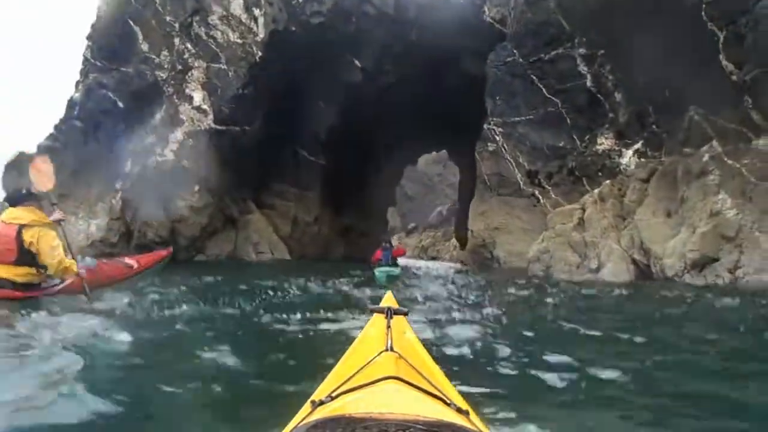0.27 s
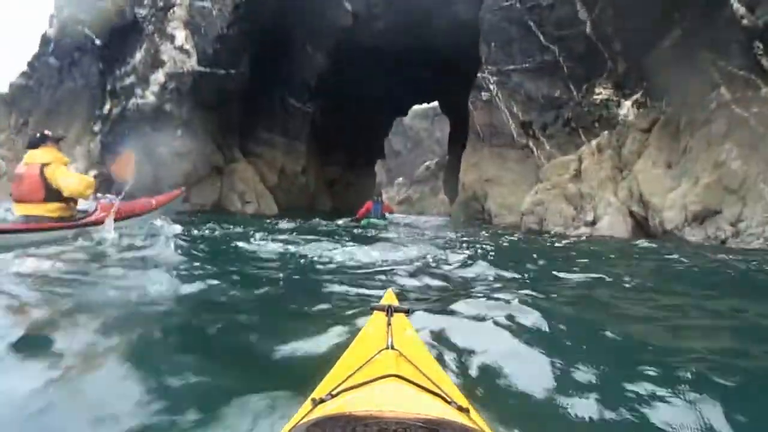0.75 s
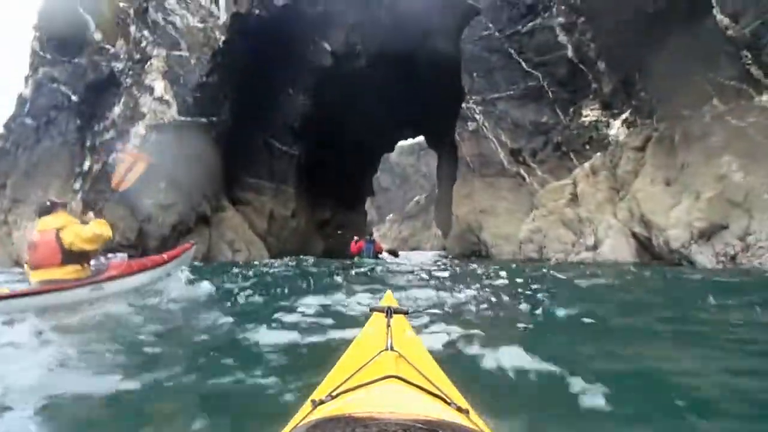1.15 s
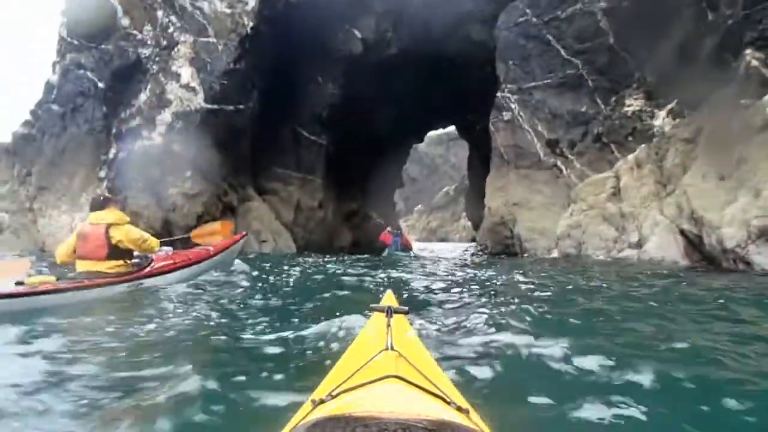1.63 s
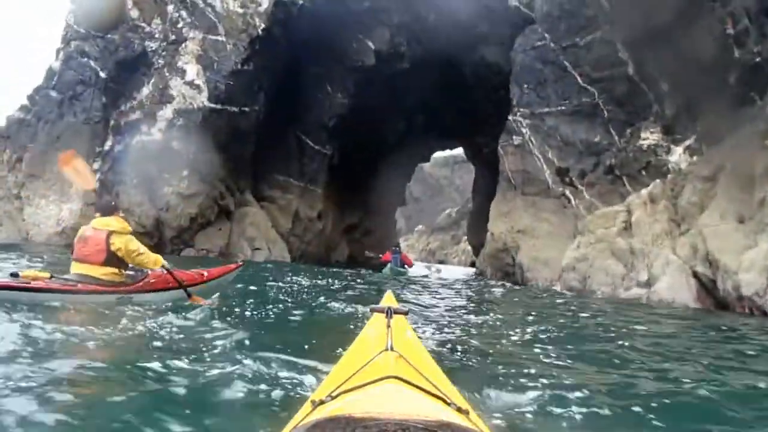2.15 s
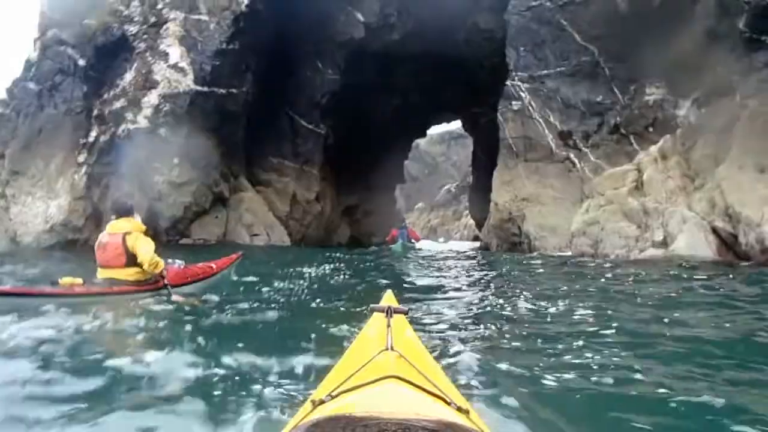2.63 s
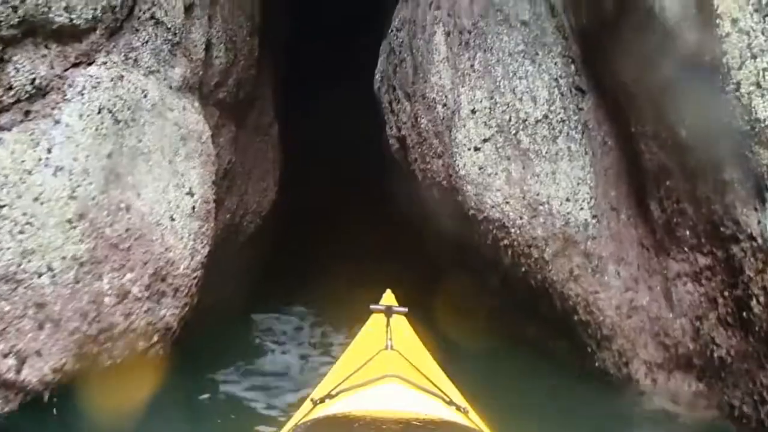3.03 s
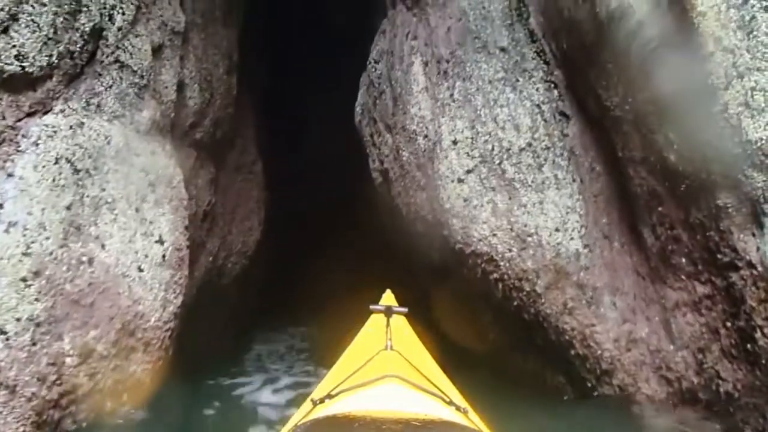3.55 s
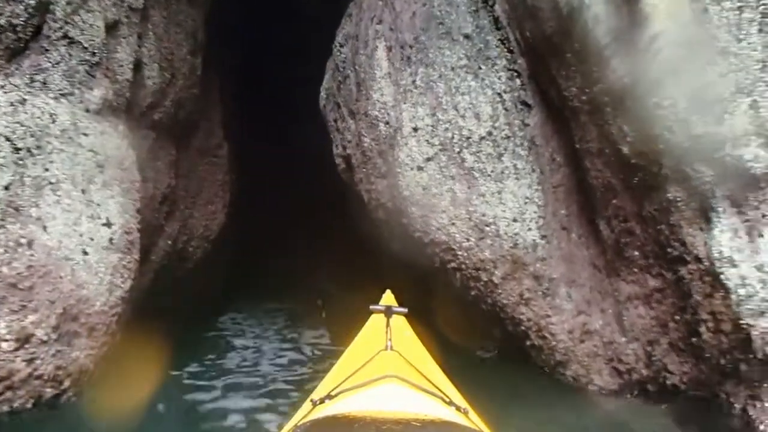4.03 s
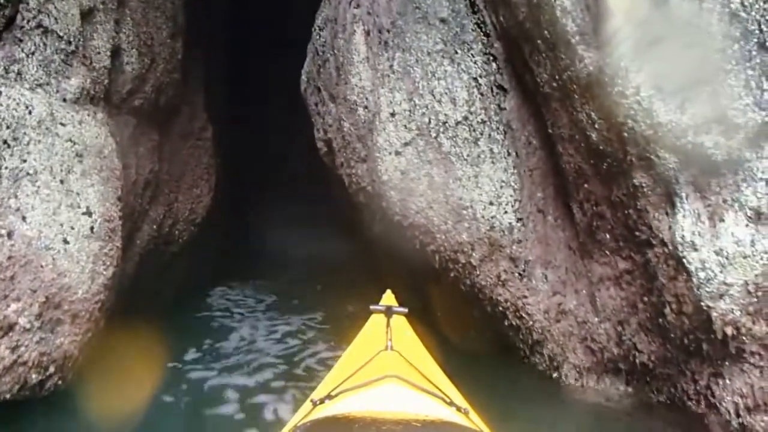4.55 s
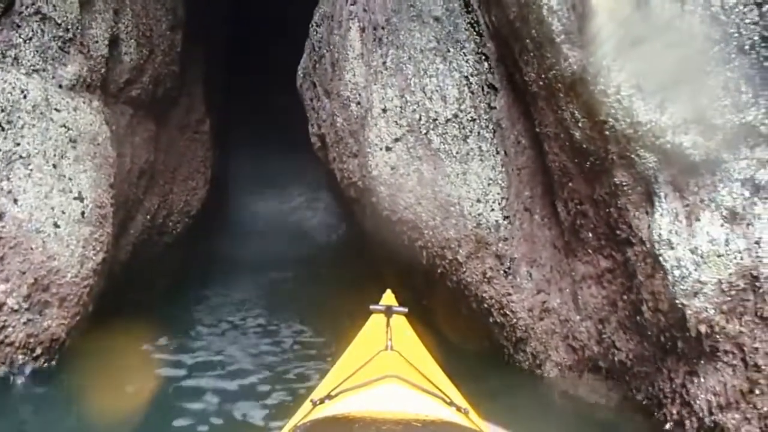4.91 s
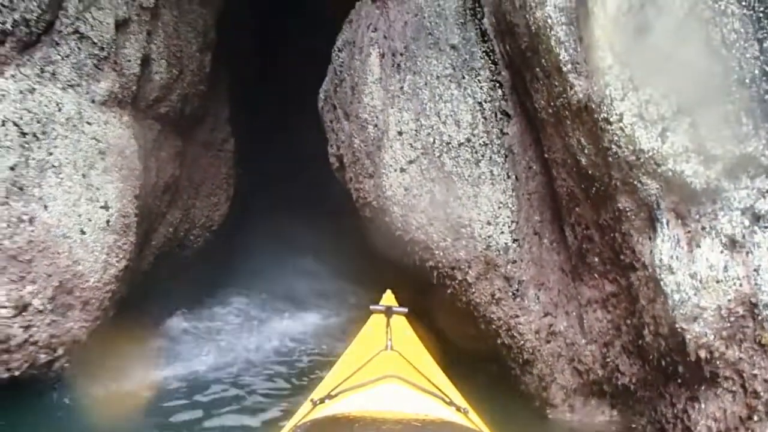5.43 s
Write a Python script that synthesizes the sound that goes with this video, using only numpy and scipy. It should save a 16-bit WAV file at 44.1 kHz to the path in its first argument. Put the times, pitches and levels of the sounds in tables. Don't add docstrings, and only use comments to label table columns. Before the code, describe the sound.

Quiet water laps and ticks against a plastic kayak, then abruptly swells rush hissing into a tight rock gully, booming and bursting into spray.

```python
import sys
import numpy as np
from scipy import signal
from scipy.fft import rfft, irfft, next_fast_len
from scipy.io import wavfile
from scipy.ndimage import uniform_filter1d, map_coordinates

SR = 44100
rng = np.random.default_rng(int(sys.argv[2]) if len(sys.argv) > 2 else 0)


def field_ratio(decibels):
    return 10 ** (np.asarray(decibels, dtype=float) / 20)


def inscribe(sig):
    pcm = np.round(np.clip(np.atleast_2d(sig).T, -1, 1) * 32767)
    wavfile.write(sys.argv[1], SR, pcm.astype(np.int16))


N = 250047


def unit(x):
    return x / np.sqrt(np.mean(x ** 2) + 1e-20)


def along(points, hz):
    f, v = np.transpose(points)
    return np.interp(np.log(hz + 1), np.log(f + 1), v)


def wobble(rate):
    return map_coordinates(rng.standard_normal(int(N * rate / SR) + 4), [np.arange(N) * rate / SR])


def curves(rows):
    s, *columns = np.transpose(rows)
    return [np.interp(np.arange(N) / SR, s, column) for column in columns]


def filtered(x, response):
    m = next_fast_len(N + 8192)
    return irfft(rfft(x, m) * response(np.fft.rfftfreq(m, 1 / SR)), m)[:N]


def resonant(modes):
    def response(f):
        total = 1
        for center, width, db in modes:
            total = total + field_ratio(db) * 1j * f * width / (center * center - f * f + 1j * f * width)
        return total
    return response


def rush(spectrum, patchy_db):
    z = signal.stft(rng.standard_normal(N + 512), nperseg=512)[2]
    field = uniform_filter1d(rng.standard_normal(z.shape), size=6, axis=0)
    field = uniform_filter1d(field, size=7, axis=1)
    x = signal.istft(z * field_ratio(patchy_db * unit(field)), nperseg=512)[1][:N]
    return unit(filtered(x, lambda hz: field_ratio(along(spectrum, hz))))


def bubbles(s, db, hz, rise, life, hold=2, soft=0.071, bend=1, size=700):
    t = np.arange(size) / SR
    s, db, hz, rise, life, hold = (np.reshape(v, (-1, 1)) for v in (s, db, hz, rise, life, hold))
    age = t / life
    wave = np.sin(2 * np.pi * hz * t * (1 + rise * np.minimum(age, 2) ** bend / (1 + bend)))
    shape = (1 - np.exp(-age / soft)) * np.exp(-1.5 * age ** hold)
    at = np.clip((s * SR).astype(int) + np.arange(size), 0, N)
    return np.bincount(at.ravel(), (field_ratio(db) * shape * wave).ravel(), N + 1)[:N]


def swarm(count, hz, octaves, cycles, scatter_db, size):
    s, e = rng.random((count, 2)).T
    pitch = np.clip(hz * 2 ** (octaves * rng.standard_normal(count)), 500, 15000)
    big_db = np.minimum(-np.log(1 - e), 4) * scatter_db
    return unit(bubbles(s * N / SR, big_db, pitch, np.full(count, .25), cycles / pitch, size=size))


def crests(bed_db, s, db, rise, fall, curve=1):
    t = np.arange(0, N + 40, 40) / SR
    late = t - s[:, None]
    steps = np.where(late < 0, -late / np.abs(rise)[:, None], late / np.abs(fall)[:, None])
    wave_db = db[:, None] - 10 * steps ** curve
    power = np.interp(np.arange(N) / SR, t, np.sum(field_ratio(2 * wave_db), axis=0))
    return 10 * np.log10(power + field_ratio(2 * bed_db))


def entered(before, after):
    entry_s, passage_s = 2.68, 0.11
    inside = np.clip((np.arange(N) / SR - entry_s) / passage_s, 0, 1)
    return (1 - inside) * before + inside * after


# (time [s], strength [dB])
CHOP = [
    (0, -41.5),
    (.27, -43),
    (.56, -43.5),
    (.85, -45.5),
    (1.3, -42.5),
    (1.7, -41.5),
    (1.97, -38),
    (2.26, -40.5),
    (2.55, -45),
]
# (crest time [s], wash level [dB], rise [s per 10 dB], fall [s per 10 dB],
# gurgle over wash [dB])
SURGES = [(2.45, -48, 0.56, 0.4, 7.5), (2.6, -51, -0.5, 0.2, 4), (2.668, -41, 0, 0.08, 4),
          (2.70, -41, 0, 0.3, 6), (2.759, -24.5, 0.04, .1, -9), (2.865, -23.5, 0.0654, 0.1, -7),
          (2.93, -30, 0.03, 0.06, -5), (3.17, -25, 0.2443, .5, -3.5), (3.5, -31, 0.06, 0.2, -7),
          (3.89, -21.5, 0.25, 0.24, -3.5), (4.03, -32, 0, -0.1, 3), (4.185, -27, 0.06, 0.1, 0.5),
          (4.42, -23.5, 0.22, .3, -1.5), (4.56, -25.5, 0.24, 0.25, -1.5), (4.97, -41.5, 3, 0.5, 4.5),
          (5.17, -28, 0.3, 1, -21), (5.36, -28.5, 0.06, 0.4, -3), (5.45, -28, 0.23, 3, 0)]
# (crest time [s], spray level [dB], rise [s per 10 dB], fall [s per 10 dB],
# mist over spray [dB])
BURSTS = [(2.625, -35, .02, 0.08, -6), (2.7, -38, 0.2, -1, -5), (2.76, -22.5, 0.02, 0.06, -4.5),
          (2.86, -20.5, 0.0659, 0.1, -4.5), (2.93, -26, 0.06, 0.03, -8), (3.16, -23, 0.29, 0.7, -6.5),
          (3.42, -25, 0.16, 0.17, -6.5), (3.89, -20.5, 0.29, 0.22, -8), (4.11, -27.5, 0, -0.2, -1),
          (4.175, -20.5, .035, 0.05, -4.5), (4.235, -25.5, 0.03, 0, -3), (4.33, -19, 0.1145, 0.5, -1),
          (4.52, -25, 0.38, .5, -19), (4.85, -29, .04, 0.1, 0), (4.89, -22, 0.02, 0.3, -4),
          (4.95, -17, 0.11, 0.2, -1.5), (5.14, -21, 0.27, 0.9, -2), (5.27, -25, 0, 0.1, -2),
          (5.37, -23.5, 0, 0, -6), (5.67, -21, .6, 12, -3.5)]


def flow():
    chop_db, = curves(CHOP)
    s, db, rise, fall, over = np.transpose(SURGES)
    gurgle_db = crests(chop_db - 0.6, s, db + over, rise, fall)
    wash_db = crests(chop_db, s, db, rise, fall)
    s, db, rise, fall, over = np.transpose(BURSTS)
    spray_db = crests(chop_db + 2.5, s, db, rise, fall)
    mist_db = crests(chop_db - 2, s, db + over, rise, fall)
    return gurgle_db, wash_db, spray_db, mist_db


# (frequency [Hz], level [dB per Hz])
GURGLE = [(200, -23), (500, -5), (900, 0.5), (1300, -2), (2000, -11.5), (4000, -35)]


def gurgle(sparse_db):
    big = swarm(count=700, hz=888, octaves=0.464, cycles=9.1, scatter_db=3.0, size=500)
    return rush(GURGLE, patchy_db=1.13) + field_ratio(sparse_db - 13.0) * big


# (frequency [Hz], level [dB per Hz])
WASH = [(500, -64), (1200, -2.5), (1800, 0.5), (2800, -0.5), (4000, -4.5), (8000, -43)]


def wash(sparse_db):
    small = swarm(count=1500, hz=2493, octaves=0.448, cycles=11.2, scatter_db=0, size=300)
    return rush(WASH, patchy_db=1.2) + field_ratio(sparse_db - 5) * small


# (frequency [Hz], level [dB per Hz])
SPRAY = [(800, -45), (2200, -3.5), (3500, 0), (6000, 1.25), (7500, -6), (10000, -16), (14000, -50)]


def spray(sparse_db):
    fizz = swarm(count=5000, hz=4440, octaves=0.535, cycles=4, scatter_db=5.5, size=80)
    return rush(SPRAY, patchy_db=1.15) + field_ratio(sparse_db - 6.5) * fizz


# (frequency [Hz], level [dB per Hz])
MIST = [(3000, -40), (6500, 1), (8500, 0), (12500, -1), (14500, -8), (16000, -16)]


def mist(sparse_db):
    prickle = swarm(count=6000, hz=10500, octaves=.35, cycles=3.2, scatter_db=6, size=40)
    return rush(MIST, patchy_db=1.86) + field_ratio(sparse_db - 7.5) * prickle


def foam():
    gurgle_db, wash_db, spray_db, mist_db = flow()
    sparse_db = -.37 * (spray_db + 37.5)
    slosh = field_ratio(0.95 * sparse_db) * (0.49 * wobble(16) + 0.5 * wobble(35))
    water = field_ratio(gurgle_db + 1.6 * slosh - 0.23) * gurgle(sparse_db)
    water += field_ratio(wash_db + 1.2 * slosh - 0.5) * wash(sparse_db)
    water += field_ratio(spray_db + 1.8 * slosh - 3) * spray(sparse_db)
    water += field_ratio(mist_db + 0.77 * slosh - 3) * mist(sparse_db)
    return water


# (frequency [Hz], width [Hz], level [dB])
DECK = [(1760, 910, -15), (2900, 1400, -20), (4500, 2100, -15.5)]


def deck(x):
    def comb(f):
        return 1 - sum((-1) ** k * (resonant([mode])(f) - 1) for k, mode in enumerate(DECK))
    return entered(field_ratio(0.35) * filtered(x, comb), x)


# (time [s], boom level [dB], fall [s per 10 dB],
# heave over boom [dB], roll over boom [dB])
SLAMS = [(.16, -55, 0.5, -15, -11), (.43, -56, 0.4, -18, -8), (1.3, -58, 0.35, -6, -8),
         (1.44, -53, 0.1, -8, -5), (1.74, -45.5, 0.28, -23, -20), (2.03, -47, 0.02, -9, 4),
         (2.45, -52, 1, -34, -28), (2.27, -55, 0.1, -12, -5.5), (2.8, -47, 0.2, -10, -18),
         (2.91, -49, 0.2, -18, -5.5), (3.2, -37.5, 0.15, -37, -16), (3.41, -48, 0, -16, -11),
         (3.68, -42, 0, -16, -17), (3.81, -47, -0.4, -6, -5), (3.87, -35, 0.2, -18, -0.5),
         (4.25, -40.5, 0, -3.5, 0), (4.37, -26.5, 0.15, -21.5, -7), (4.47, -23, 0.1234, -6, -13),
         (4.59, -26.5, 0.09, -13, -5), (4.76, -35.5, 0.3, -22, -11), (4.96, -28, 0.09, -9, -6.5),
         (5.08, -36.5, 0.1, -17, -21), (5.4, -36, 0.1, -25, -15.5), (5.52, -40, 0, -22, -15.5)]


def slams():
    calm_db = -43
    stir_db = flow()[0] - calm_db
    s, db, fall, heave_over, roll_over = np.transpose(SLAMS)
    # (steady level [dB], dB per dB of gurgle, slam level over boom [dB])
    layers = (-79, .1, heave_over), (-73.5, 0.67, roll_over), (-53, 0.88, 0)
    rise = 0.63 * fall
    return [crests(bed_db + follows * stir_db, s, db + over, rise, fall, curve=0.98)
            for bed_db, follows, over in layers]


# (frequency [Hz], width [Hz], level [dB])
CLEFT = [(108, 12, 1), (210, 4.4, 7.5), (315.4, 7.7, 0), (451, 11, 1)]


def cleft(x):
    return entered(x, unit(filtered(x, resonant(CLEFT))))


# (frequency [Hz], level [dB per Hz])
HEAVE = [(20, -30), (35, -21), (55, 0.5), (80, 2), (105, -10), (200, -41)]
# (frequency [Hz], level [dB per Hz])
ROLL = [(40, -40), (75, -17), (100, 0), (135, -6), (175, -9), (300, -30.5)]
# (frequency [Hz], level [dB per Hz])
BOOM = [(60, -55), (140, -7), (300, 1), (520, -1.5), (900, -7), (2000, -60)]


def swell():
    heave_db, roll_db, boom_db = slams()
    heave = unit(field_ratio(1.2 * wobble(25.3)) * rush(HEAVE, patchy_db=0.5))
    roll = cleft(rush(ROLL, patchy_db=1.5))
    boom = cleft(rush(BOOM, patchy_db=-0.1))
    return field_ratio(heave_db) * heave + field_ratio(roll_db) * roll + field_ratio(boom_db) * boom


# (frequency [Hz], level [dB per Hz])
FAR = [(24, -51), (40, -31), (810, 7.5), (1630, -23), (2980, 4), (4680, -24), (5720, -5.5), (8130, -18),
       (12500, 1), (16000, -12)]


def far_surf():
    return field_ratio(-43.5 - 5.5) * rush(FAR, patchy_db=3.5)


def small_source(x):
    return filtered(x, lambda hz: (1j * hz / (250 + 1j * hz)) ** 2)


# (time [s], peak level [dB], pitch [Hz])
PLOPS = [(.073, -23, 2470), (.112, -26, 805), (.177, -26, 836), (.284, -25.5, 1420), (.321, -26, 826),
         (.576, -19.5, 1550), (.703, -26.5, 1600), (.78, -26, 700), (1.088, -19, 2770), (1.29, -20, 2920),
         (1.579, -22, 2700), (2.625, -18, 2020), (2.733, -18, 1000), (2.815, -17, 1180), (2.889, -17, 1350),
         (2.925, -17, 1420), (2.108, -22, 613), (2.115, -24, 810), (2.591, -20, 2060), (2.696, -20, 704),
         (1.716, -26, 560), (1.75, -26, 380), (5.045, -18, 320), (3.052, -9, 2670), (3.249, -16.5, 2870),
         (5.084, -20, 2890), (5.373, -13.5, 412)]


def plops():
    s, db, hz = np.transpose(PLOPS)
    return small_source(bubbles(s, db - 6.5, 0.912 * hz, 0.24, 9.2 / hz, soft=0.15, size=1500))


# (time [s], peak level [dB], pitch [Hz],
# length [cycles])
DROPS = [(0.0845, -12.5, 6200, 2.6), (0.6794, -22, 2100, 1.5), (1.0931, -13.5, 4650, 2.7),
         (1.0964, -21, 12100, 3.1), (1.2077, -22, 9800, 4), (1.449, -27, 1300, 2.3),
         (1.8405, -21, 6300, 3.5), (2.661, -21.5, 1350, 3), (2.745, -16, 2500, 3), (2.7605, -15, 1800, 4),
         (2.851, -15, 3700, 5.5), (2.8745, -19, 1800, 4), (2.903, -15, 2500, 5), (2.836, -16, 1700, 3),
         (1.3977, -27, 3390, 4.1), (1.9994, -23, 11000, 3), (1.4491, -20.5, 2580, 3.2),
         (1.6531, -24, 3130, 3.5), (2.0704, -24, 6160, 3.5), (2.109, -18, 3150, 2.9),
         (2.302, -25, 6130, 3.5), (2.4357, -18, 2980, 2.5), (2.577, -24, 5330, 3.5),
         (2.6884, -15.5, 3200, 4.5), (2.8546, -20, 3130, 2.6), (2.9144, -12, 6830, 3.5),
         (2.937, -3, 4000, 3.5), (2.944, -20, 3800, 3.5), (3.2324, -9, 5930, 3.5), (3.4952, -21, 850, 2.3),
         (3.493, -14, 1700, 3), (3.4992, -4.5, 2410, 1.2), (3.4745, -12.5, 11500, 5.6),
         (3.694, -17, 12500, 5)]


def ticks():
    s, db, hz, cycles = np.transpose(DROPS)
    return bubbles(s + 0.0009, db + 4.0, hz, 0 * s, cycles / hz, soft=0.29, size=160)


# (time [s], peak level [dB], pitch [Hz])
BLIPS = [(0.1494, -28, 2010), (0.4094, -27.5, 2260), (0.4464, -23.5, 6020), (0.5132, -28, 3430),
         (0.744, -25, 4000), (0.7562, -24, 3800), (0.8589, -28, 3060), (0.9114, -36, 6220),
         (1.2033, -23, 4270), (1.2194, -27, 2410), (1.4574, -27, 3130), (1.43, -25, 5570),
         (1.5534, -27, 5920), (1.8211, -24, 5640), (1.6094, -26, 5800), (1.75, -22, 5220),
         (1.949, -23, 3650), (1.9794, -26, 6010), (2.1024, -23, 2900), (2.1954, -21, 2740),
         (2.456, -27, 2950), (2.6344, -19, 5950), (2.6962, -16, 2670), (2.7614, -20, 5660),
         (3.5144, -16, 5530)]


def blips():
    s, db, hz = np.transpose(BLIPS)
    return bubbles(s + .0005, db - 1.5, 0.965 * hz, 0.1, 8.0 / hz, soft=0.19, size=400)


# (time [s], peak level [dB], pitch [Hz], life [s])
THUMPS = [(0.154, -53, 148, 0.025), (0.434, -37, 102, 0.03), (0.991, -36, 203, 0.033),
          (1.329, -50, 83.4, 0.026), (1.432, -45, 205, 0.03), (1.708, -31, 228, 0.036),
          (2.01, -35, 207, 0.034), (2.084, -28, 195, 0.03), (2.252, -31, 135, 0.025),
          (2.419, -50, 258, 0.025), (2.786, -28, 184, 0.054), (3.785, -26, 62, 0.049),
          (3.809, -22, 210, 0.035), (4.249, -29, 61.9, 0.03), (4.46, -32, 207, 0.03),
          (4.579, -21.5, 223, 0.027), (4.954, -19, 242, 0.05)]


def thumps():
    s, db, hz, life = np.transpose(THUMPS)
    return bubbles(s, db - 7.0, hz, 0 * s - .2, life, soft=0.099, size=4000)


# (time [s], peak level [dB])
SPLASHES = [(.2944, -21), (.4444, -23), (.5144, -24), (.6794, -26), (1.0306, -19), (1.2124, -26),
            (1.5394, -22), (1.7444, -19), (1.8332, -15.5), (2.5194, -22), (2.603, -18), (2.6234, -14.5),
            (2.6658, -13.5), (2.713, -11), (2.7474, -10), (2.7694, -9), (2.8494, -6), (2.899, -3.5),
            (3.4735, -13), (3.6994, -13), (4.0994, -10), (4.1544, -18)]


def splashes():
    life_s = 0.013
    s, db = (column[:, None] for column in np.transpose(SPLASHES))
    age = np.maximum(np.arange(0, N, 20) / SR - s, 0) / life_s
    burst = np.sum(field_ratio(db - 14.5) * (1 - np.exp(-age / 0.053)) * np.exp(-1.5 * age), axis=0)
    hiss = unit(rush(SPRAY, patchy_db=3.5) + field_ratio(-0.5) * rush(MIST, patchy_db=-0.5))
    return np.repeat(burst, 20)[:N] * hiss


# (time [s], peak level [dB])
SNAPS = [(0.7103, -25), (1.1074, -18), (1.2019, -11), (1.737, -28), (1.8444, -26), (1.9544, -24),
         (1.9694, -23), (1.9944, -25), (2.0064, -21), (2.1864, -20), (2.4464, -25)]


def snaps():
    s, db = np.transpose(SNAPS)
    direct = bubbles(s + 0.0003, db + 6.5, 9100, 0, 0.00013, soft=0.16, size=30)
    t = np.arange(300) / SR
    rattle = field_ratio(-19 - 60 * t / 0.0097) * rng.standard_normal(300)
    return direct + field_ratio(-14) * np.roll(direct, 21) + np.convolve(direct, rattle)[:N]


# (time [s], level [dB], pitch [Hz], rise [share], life [s])
GULPS = [
    (.8905, -26.5, 780, 0.37, 0.015),
    (1.7324, -21.5, 480, .15, .0067),
    (2.1265, -23, 800, .3, .004),
    (2.131, -23, 860, .2, 0.0057),
    (2.4187, -24, 1180, .29, .014),
    (2.4627, -23.5, 640, 1.0, .016),
    (2.843, -22.5, 980, 0.56, .016),
]
ABRUPT = 1.8, 8.8


def gulps():
    s, db, hz, rise, life = np.transpose(GULPS)
    hold = ABRUPT[0] + ABRUPT[1] * rise ** 3
    return small_source(bubbles(s, db, hz, rise, life, hold=hold, soft=0.052, bend=1.54, size=1500))


# (time [s], level [dB], pitch [Hz], rise [share], life [s])
POCKETS = [
    (3.87, -31, 205, .03, .1),
    (4.345, -19, 424, .18, .075),
    (4.41, -21, 210, .02, .1),
    (4.432, -16, 325, .03, 0.027),
    (4.435, -25, 450, .04, .03),
    (4.48, -17.5, 325, -.03, 0.059),
    (4.54, -21, 318, .04, 0.032),
    (4.625, -26, 185, .03, 0.027),
]


def pockets():
    return bubbles(*np.transpose(POCKETS), hold=3, soft=0.3, size=7000)


# (frequency [Hz], width [Hz], added level [dB])
HOUSING = [(5800, 1170, -2), (12600, 2600, 1)]


def housing(x):
    ports = resonant(HOUSING)
    return filtered(x, lambda hz: ports(hz) * (hz < 15750))


# (time [s], low edge [Hz], high edge [Hz])
SPLITS = [(1.785, 4110, 5770), (1.785, 6180, 8320), (3.016, 8840, 10410), (3.178, 4140, 5240),
          (3.178, 6200, 7630), (3.178, 13040, 14550), (3.875, 4130, 5250), (4.455, 7480, 9060),
          (4.989, 8860, 11110)]


def split(x):
    side, size = np.zeros(N), 2048
    hz = np.fft.rfftfreq(size, 1 / SR)
    for s, low_hz, high_hz in SPLITS:
        at = round(s * SR)
        band = irfft(rfft(x[at + size:][:size]) * (hz > low_hz) * (hz < high_hz))
        side[at:at + size] += field_ratio(-4.5) * np.hanning(size) ** .5 * band
    return side


def scene():
    water = deck(foam()) + swell() + far_surf()
    near = plops() + ticks() + blips() + thumps() + splashes() + snaps() + gulps() + pockets()
    mono = water + near
    return np.array([mono, mono])


def top_cut(x):
    return signal.sosfilt(signal.butter(12, 16640, fs=SR, output="sos"), x)


def record(dry):
    heard = housing(dry[0])
    side = split(heard)
    return top_cut(np.array([heard + side, heard - side]))


dry = scene()
out = record(dry)
inscribe(out)
```